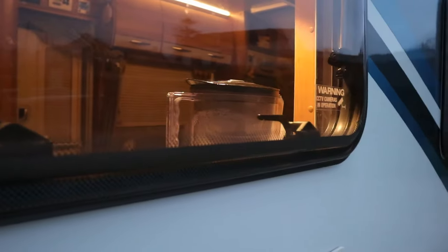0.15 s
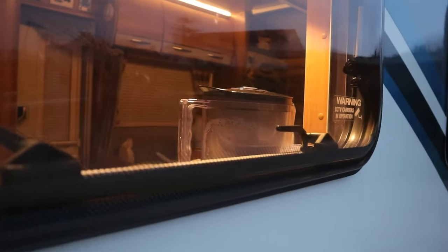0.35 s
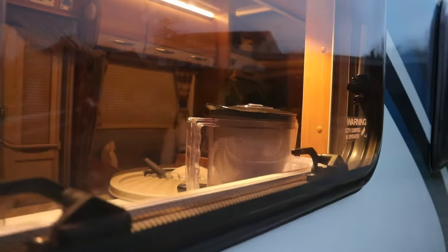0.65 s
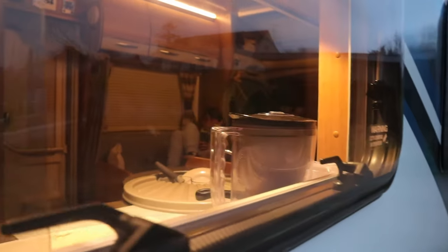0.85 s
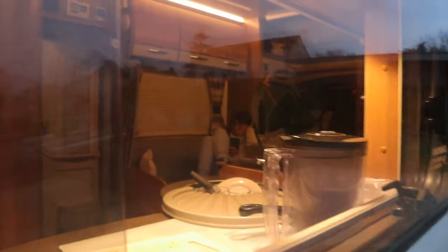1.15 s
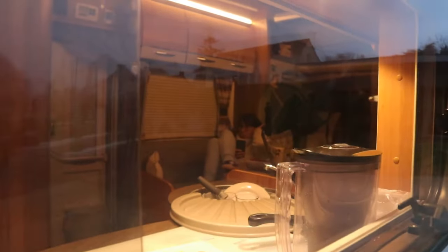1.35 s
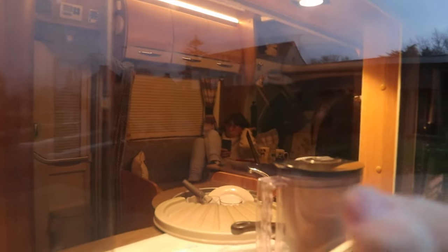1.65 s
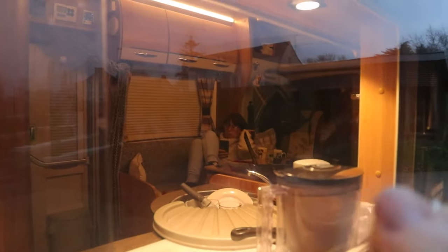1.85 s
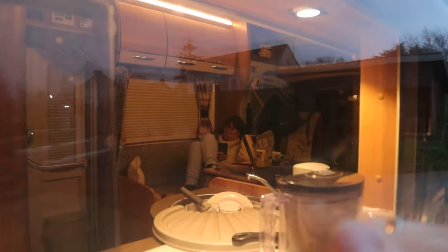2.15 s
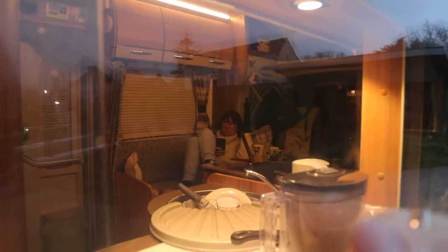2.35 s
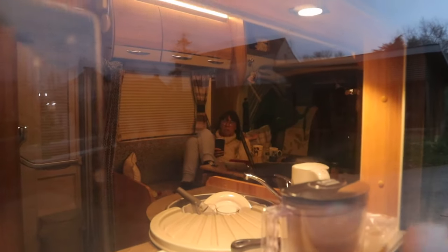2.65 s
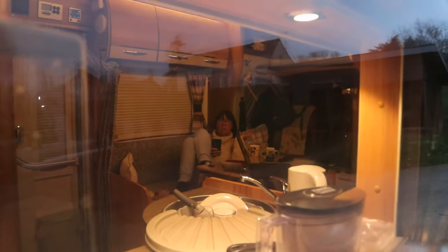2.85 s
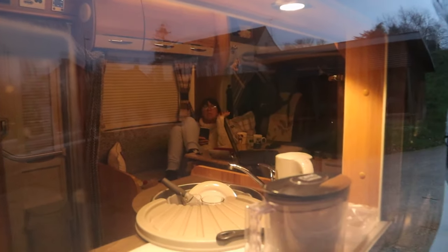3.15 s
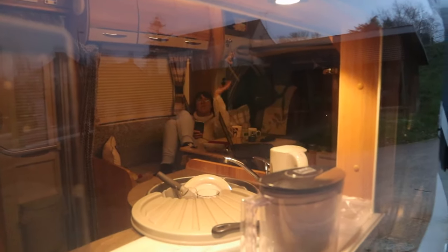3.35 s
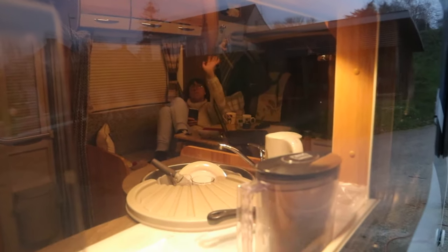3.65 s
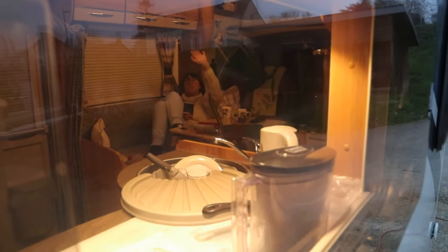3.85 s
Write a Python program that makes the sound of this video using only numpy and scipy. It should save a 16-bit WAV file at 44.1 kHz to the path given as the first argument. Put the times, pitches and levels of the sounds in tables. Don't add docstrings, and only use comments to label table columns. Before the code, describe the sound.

A quiet outdoor place, heard from a hand-held camera with stereo microphones close to a camper window. Far traffic rumble, a soft hum and thin air hiss run throughout. In the first 0.1 s a last step scuffs and cracks grit; low thuds continue to about 0.4 s. A hard strap clip snaps at 0.2 s. Sleeves rustle until about 1.2 s, with plastic case creaks at 0.42 and 0.67 s and the sharpest click at 0.74 s. It then calms, until a small creak and thud just before 1.75 s. Six knuckle raps follow at 1.79, 2.02, 2.23, 2.43, 2.65 and 2.86 s: hollow, dull, short plastic knocks. The first is loudest and clips; the fifth is more brittle, the last softest. A loose catch and stay arm tick after each. The background drops at the first rap and creeps back, leaving faint air and traffic to 4 s.

```python
import sys
import numpy as np
from scipy import signal
from scipy.fft import rfft, irfft, next_fast_len
from scipy.io import wavfile
from scipy.ndimage import uniform_filter1d

SR = 44100
rng = np.random.default_rng(int(sys.argv[2]) if len(sys.argv) > 2 else 0)


def to_wav(s):
    ch = np.atleast_2d(s).T
    pcm = np.round(np.clip(ch, -1, 1) * 32767)
    wavfile.write(sys.argv[1], SR, pcm.astype(np.int16))


def volts_from_db(level):
    exponent = np.asarray(level, float) / 20
    return 10 ** exponent


N = 176488

# (frequency [Hz], density [dB/Hz])
RUMBLE_SPECTRUM = [(13, -41), (22, -14.5), (43, -5), (70, -0.5), (97, -2), (156, -1.5), (300, -13.5),
                   (390, -36), (660, -120)]
HUM_SPECTRUM = [(130, -26.5), (220, -2), (307, -2.5), (474, -1), (802, -3.5), (1400, -10.5), (1820, -38.5),
                (3080, -120)]
# (frequency [Hz], density [dB/Hz])
SCUFF_SPECTRUM = [(650, -31.5), (1000, -6.5), (1420, -4), (2100, -9), (2850, -13.5), (4400, -30),
                  (5720, -49.5), (9680, -120)]
HISS_SPECTRUM = [(2200, -16.5), (3700, -1), (4500, -5.5), (6300, -7.5), (8000, -11), (10000, -14.5),
                 (13000, -25.5), (15500, -41), (17000, -82)]
# (frequency [Hz], correlation [-1..1])
PORT_LIKENESS = [(60, 1), (200, 1), (360, 0.88), (670, 0.87), (1200, 0.67), (2200, .5), (4000, -0.3),
                 (6000, -0.59), (12000, -0.65)]
# (time [s], level [dB])
BREEZE = [(0, -1), (.25, -3.5), (.45, -4.5), (.7, -0.5), (.95, -2), (1.2, 1.5), (1.75, 3), (2.601, -0.5),
          (3.2, 4.5), (3.65, 2.5), (4, 3)]
# (time [s], length [s], rms level [dB], brightness [dB/octave])
RUSTLES = [
    (0.047, 0.13, -31.5, -10.5),
    (0.145, 0.074, -31.5, -12.5),
    (0.312, 0.17, -33.5, -11.5),
    (0.603, 0.16, -33, -16.5),
    (0.751, 0.038, -28, -16),
    (0.802, 0.17, -36, -16),
    (0.979, 0.041, -35.5, -7),
    (1.018, 0.17, -39, -8),
]
# (frequency [Hz], width [Hz], boost [dB])
CLOTH_FOLDS = [(800, 170, 3), (1420, 250, 9), (2250, 410, 7)]
# (time [s], peak level [dB], frequency [Hz], length [s])
THUDS = [(0.054, -22.5, 82.5, 0.064), (.14, -24.5, 136, 0.048), (0.224, -18.5, 75, 0.05),
         (0.362, -24, 79, 0.043), (0.407, -27, 107.6, 0.053), (.75, -27, 180, 0.047),
         (.762, -27.5, 730, 0.0094), (.98, -24, 183, 0.028), (0.995, -25.5, 49.6, 0.12),
         (1.713, -22.5, 139, .05), (3.262, -39.5, 59.5, 0.049), (3.48, -39, 109, 0.075),
         (3.664, -41, 54.7, 0.09), (3.93, -42, 150, 0.055)]
# (time [s], peak level [dB], left-right [dB])
GRIT = [
    (.0488, -26, 0.5),
    (.0640, -33, 21),
    (.0677, -23.5, -6.5),
    (.0715, -36, 6),
    (.0950, -35, 6),
    (.7640, -43, -2),
    (.7700, -52, -9),
]
# (frequency [Hz], width [Hz], level [dB])
STONE_MODES = [(810, 130, -0.5), (1385, 140, -3), (2130, 220, -0.5), (2900, 790, -16.5), (5200, 600, -43)]
# (time [s], peak level [dB], left-right [dB])
CREAKS = [
    (0.4244, -10, -6.5),
    (0.6674, -22, -4),
    (0.7324, -19.5, 3),
    (0.7402, -4, -7),
    (0.7524, -26, -6),
    (0.9807, -28.5, -2),
    (1.0276, -33, -21),
    (1.1608, -35, -1),
    (1.7529, -16.5, -9.5),
]
# (frequency [Hz], width [Hz], level [dB])
CASE_MODES = [(1320, 480, -10), (2240, 340, 3.5), (2880, 410, -6), (3750, 400, -8.5), (4870, 1200, -14)]
# (time [s], peak level [dB], left-right [dB])
CLIP_SNAP = [
    (0.2018, -5, 3),
]
# (frequency [Hz], width [Hz], level [dB])
CLIP_MODES = [(1406, 360, -14.5), (2235, 130, -16), (2670, 180, 6), (3050, 180, 0), (2930, 48, -10.5),
              (3436, 110, -3.5), (4000, 310, -10), (8800, 1500, -34)]
# (time [s], peak level [dB])
CATCH_KNOCKS = [
    (1.8043, -24),
    (2.0301, -19.5),
    (2.2409, -24),
    (2.4463, -22),
    (2.6618, -21),
    (2.8718, -22),
]
# (frequency [Hz], width [Hz], level [dB])
CATCH_MODES = [(1720, 410, -1), (4140, 680, -9.5), (5900, 1700, -22.5), (8200, 350, -26)]
STAY_MODES = [(3470, 480, -1), (5200, 260, -2), (7200, 470, -7.5)]
# (time [s], peak level [dB], skin slap level [dB], tilt of struck spot [dB/octave], contact [s])
RAPS = [
    (1.7901, 5.5, -28, 2.2, .0014),
    (2.0164, -1.5, -47, -.3, .0013),
    (2.2273, -1.5, -45.5, 0.3, .0011),
    (2.4328, -1, -39, -0.3, .0011),
    (2.648, -1.5, -28, 0.3, .0012),
    (2.858, -3.5, -40, -0.6, .0014),
]
# (frequency [Hz], level [dB], t60 [s], sign of mode shape under the knuckle)
PANE_MODES = [(43.1, -19, 0.39, 1), (82.5, -13, 0.18, -1), (141.6, -19, 0.24, -1), (183, -8.5, 0.078, -1),
              (236.3, -11.5, 0.1, -1), (272.5, -21, 0.14, -1), (315, -1.5, 0.016, 1), (380, -17, 0.12, -1),
              (430.7, -8, 0.06, 1), (469, -22, 0.16, 1), (552, 0.0, 0.022, -1), (701.5, -5.9, 0.031, -1),
              (834, -12.5, 0.036, -1), (1033, -3, 0.0071, 1), (1174, -7, .01, -1)]
# (frequency [Hz], density [dB/Hz])
FRAME_SPECTRUM = [(450, -34.5), (750, -2), (1100, 1.5), (1400, -8.5), (2500, -18), (4000, -35), (7000, -42),
                  (12000, -52)]


def unit(x):
    return x / np.sqrt(np.mean(x ** 2) + 1e-20)


def along(points, hz):
    f, v = np.transpose(points)
    return np.interp(np.log(hz + 1), np.log(f + 1), v)


def filtered(x, response):
    m = next_fast_len(x.shape[-1] + 8192)
    spectrum = rfft(x, m) * response(np.fft.rfftfreq(m, 1 / SR))
    return irfft(spectrum, m)[..., :x.shape[-1]]


def add(track, start_s, sound):
    part = track[:, round(start_s * SR):][:, :sound.shape[-1]]
    part += sound[..., :part.shape[1]]


def rush(spectrum, patchy_db):
    z = signal.stft(rng.standard_normal((2, N)), nperseg=512)[2]
    patches = uniform_filter1d(rng.standard_normal(z.shape[1:]), 5, axis=0)
    patches = uniform_filter1d(patches, 8, axis=1)
    pair = signal.istft(z * volts_from_db(patchy_db * unit(patches)), nperseg=512)[1][:, :N]

    def mid_side(hz):
        angle = np.arccos(np.clip(along(PORT_LIKENESS, hz), -1, 1)) / 2
        return volts_from_db(along(spectrum, hz)) * [np.cos(angle), np.sin(angle)]

    mid, side = filtered(pair, mid_side)
    return unit(np.array([mid + side, mid - side]))


def gain_control():
    first_cut_db, next_cut_db, hold_s, return_db_per_s = 12, 3, 0.12, 11
    t, gain_db = np.arange(N) / SR, np.zeros(N)
    for k, (rap_s, *_) in enumerate(RAPS):
        i = round(rap_s * SR)
        low_db = gain_db[i] - (next_cut_db if k else first_cut_db)
        climb_db = return_db_per_s * np.maximum(0, t[i:] - rap_s - hold_s)
        gain_db[i:] = np.minimum(0, low_db + climb_db)
    return gain_db


def background():
    gain_db = gain_control()
    breeze_db = np.interp(np.arange(N) / SR, *np.transpose(BREEZE))

    def bed(spectrum, patchy_db, level_db, gain_share, breeze_share):
        level = volts_from_db(level_db + gain_share * gain_db + breeze_share * breeze_db)
        return level * rush(spectrum, patchy_db)

    out = bed(RUMBLE_SPECTRUM, patchy_db=0.0, level_db=-36, gain_share=0.69, breeze_share=0.05)
    out += bed(HUM_SPECTRUM, patchy_db=1.5, level_db=-40, gain_share=0.74, breeze_share=-0.2)
    out += bed(SCUFF_SPECTRUM, patchy_db=1.87, level_db=-46, gain_share=0.95, breeze_share=0.77)
    out += bed(HISS_SPECTRUM, patchy_db=2.3, level_db=-55.5, gain_share=1, breeze_share=1)
    return out


def rustles():
    out = np.zeros((2, N))
    for start_s, length_s, level_db, slope_db in RUSTLES:
        def colour(f):
            folds_db = sum(d * np.exp(-((f - c) / w) ** 2) for c, w, d in CLOTH_FOLDS)
            tilt_db = slope_db * np.log2(f / 1000 + 0.19)
            low_cut = f ** 2 / (f ** 2 + 380 ** 2)
            return volts_from_db(tilt_db + folds_db) * low_cut / (1 + (f / 8000) ** 4)

        t = np.arange(round(length_s * SR)) / SR
        clumps = volts_from_db(3.6 * unit(uniform_filter1d(rng.standard_normal(8192), size=70)))
        mid, side = rng.standard_normal((2, 8192))
        cloth = mid + 0.5 * side * np.array([[1], [-1]])
        cloth = unit(filtered(cloth * clumps, colour))
        swell = np.sin(np.pi * np.sqrt(t / length_s))
        add(out, start_s, volts_from_db(level_db) * cloth[:, :len(t)] * swell)
    return out


def thuds():
    out = np.zeros((2, N))
    for start_s, peak_db, hz, length_s in THUDS:
        t = np.arange(round(length_s * SR)) / SR
        lump = np.sin(np.pi * t / length_s) ** 2 * np.sin(2 * np.pi * hz * t)
        add(out, start_s, volts_from_db(peak_db) * lump[None])
    return out


def clicks(events, peaks, tail_db, tail_s, scatter_db, top_hz, gain_db):
    out, t = np.zeros((2, N)), np.arange(3000) / SR
    for start_s, peak_db, pan_db in events:
        mode_gain = volts_from_db(scatter_db * rng.standard_normal((len(peaks), 2, 1)))
        blow = rng.standard_normal((2, len(t))) * volts_from_db(tail_db - 60 * t / tail_s)
        blow[:, 0] = 1
        delay_s = 4e-5 * (2 - np.tanh(pan_db / 4) * np.array([[1], [-1]]))

        def response(f):
            modes = 0
            for k, (gain, (hz, width_hz, db)) in enumerate(zip(mode_gain, peaks)):
                damping = 1j * f * width_hz
                modes = modes + (-1) ** k * gain * volts_from_db(db) * damping / (hz * hz - f * f + damping)
            return modes * np.exp(-2j * np.pi * f * delay_s) / (1 + 1j * f / top_hz) ** 4

        click = filtered(blow, response)
        click /= np.abs(click).max(axis=1, keepdims=True)
        port_db = peak_db + gain_db + pan_db * np.array([[0.5], [-0.5]])
        add(out, start_s + 0.00068, volts_from_db(port_db) * click)
    return out


def grit():
    return clicks(GRIT, STONE_MODES, tail_db=-18.0, tail_s=0.013, scatter_db=5, top_hz=7000, gain_db=8.5)


def camera_handling():
    case = clicks(CREAKS, CASE_MODES, tail_db=-20, tail_s=0.011, scatter_db=3.0, top_hz=6000, gain_db=-4.5)
    clip = clicks(CLIP_SNAP, CLIP_MODES, tail_db=-21, tail_s=0.01, scatter_db=2.6, top_hz=10000, gain_db=6.5)
    return case + clip


def fittings():
    pan_db, again_s, again_db = 4, 0.0095, -39
    flight_s, stay_db, stay_loss_db, stay_wander_db = 0.0253, -46.5, 5.5, 7.5
    knocks, bounces = [], []
    for knock_s, peak_db in CATCH_KNOCKS:
        knocks.append((knock_s, peak_db, pan_db))
        knocks.append((knock_s + again_s, again_db, pan_db / 2))
        for k in range(2):
            wander_db = stay_wander_db * rng.standard_normal()
            bounces.append((knock_s + (k + 1) * flight_s, stay_db - k * stay_loss_db, wander_db))
    catch = clicks(knocks, CATCH_MODES, tail_db=-21.0, tail_s=0.03, scatter_db=4.5, top_hz=14000, gain_db=1.0)
    stay = clicks(bounces, STAY_MODES, tail_db=-5, tail_s=0.0091, scatter_db=3.5, top_hz=12000, gain_db=0.0)
    return catch + stay


def pane_ring(tilt_db, contact_s, t):
    hz, level_db, t60_s, sign = np.transpose(PANE_MODES)[:, :, None]
    spot_db = tilt_db * np.log2(hz / 300) + 1.1 * rng.standard_normal(hz.shape)
    decay = volts_from_db(level_db + spot_db - 60 * t / t60_s)
    swing = np.sign(sign) * decay * np.sin(2 * np.pi * hz * t) / hz
    push = np.sin(np.pi * np.clip(t[:200] / contact_s, 0, 1)) ** 2
    ring = np.gradient(np.convolve(swing.sum(axis=0), push)[:len(t)])
    return ring * np.exp(-(t / 0.16) ** 2) / np.abs(ring).max()


def cabin_blur(ring, t):
    cabin = rng.standard_normal(len(t)) + 0.062 * rng.standard_normal((2, len(t)))
    cabin *= volts_from_db(-60 * t / 0.14) * (1 - np.exp(-t / 0.0027))
    cabin /= np.linalg.norm(cabin[0])
    return volts_from_db(-13.5) * signal.fftconvolve(ring[None], cabin, axes=1)[:, :len(t)]


def frame_shake(peak_db, slap_db, t):
    mid, side = rng.standard_normal((2, len(t)))
    shake = mid + 0.12 * side * np.array([[1], [-1]])
    shake = unit(filtered(shake, lambda f: volts_from_db(along(FRAME_SPECTRUM, f))))
    fade = volts_from_db(slap_db - 60 * t / 0.038) + volts_from_db(peak_db - 33.0 - 60 * t / 0.13)
    return shake * fade * (1 - np.exp(-t / 0.00015))


def raps():
    out, t = np.zeros((2, N)), np.arange(SR // 4) / SR
    for start_s, peak_db, slap_db, tilt_db, contact_s in RAPS:
        ring = pane_ring(tilt_db, contact_s, t)
        ports = np.array([0.96 * np.roll(ring, shift=2), ring])
        ports += cabin_blur(ring, t)
        add(out, start_s, volts_from_db(peak_db) * ports + frame_shake(peak_db, slap_db, t))
    return out


def scene():
    feet = rustles() + thuds() + grit()
    window = fittings() + raps()
    return background() + feet + camera_handling() + window


def top_cut(x):
    return signal.sosfilt(signal.butter(12, 15700, fs=SR, output="sos"), x)


def record(dry):
    x = filtered(dry, lambda hz: 1 / (1 + (hz / 12500) ** 8))
    x = x / (1 + np.abs(x) ** 12) ** (1 / 12)
    return top_cut(x)


dry = scene()
out = record(dry)
to_wav(out)
```